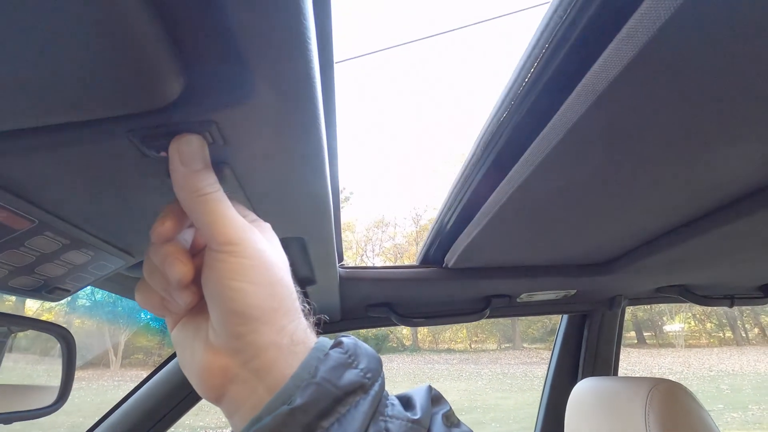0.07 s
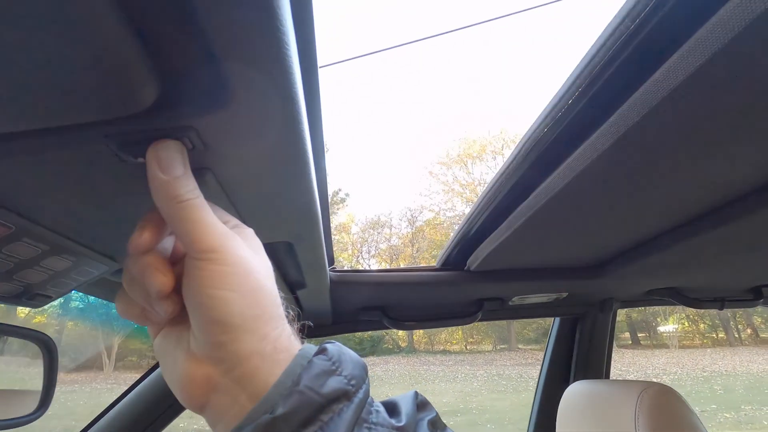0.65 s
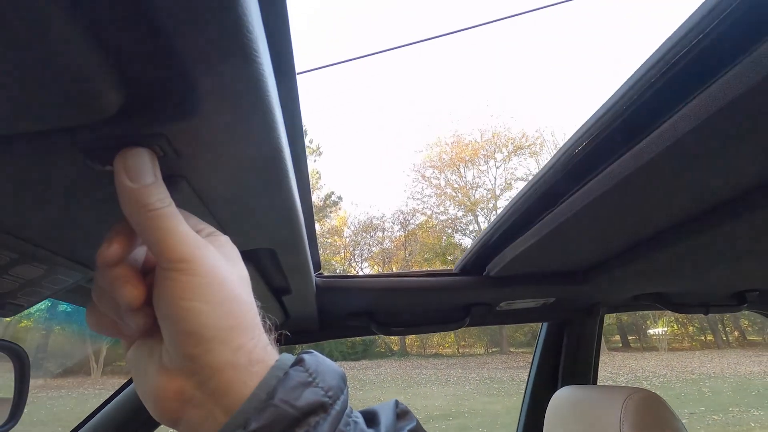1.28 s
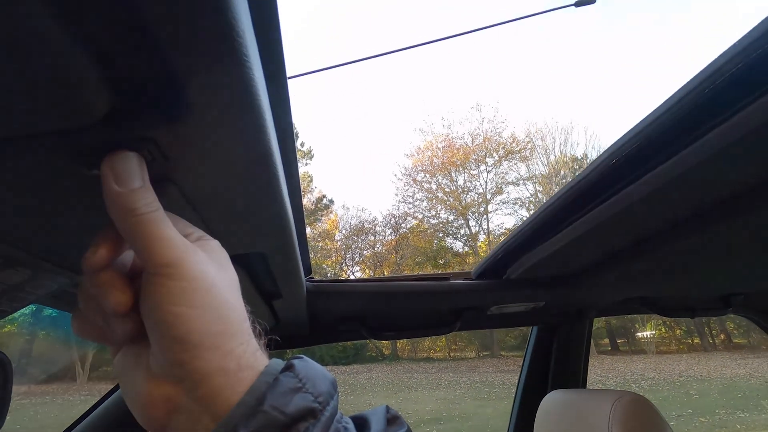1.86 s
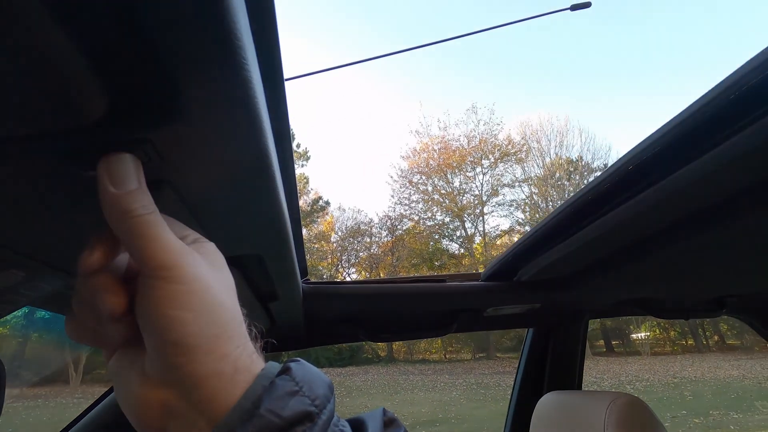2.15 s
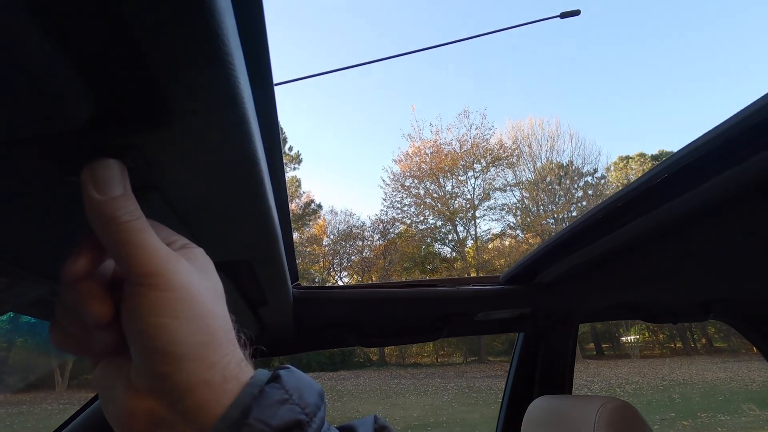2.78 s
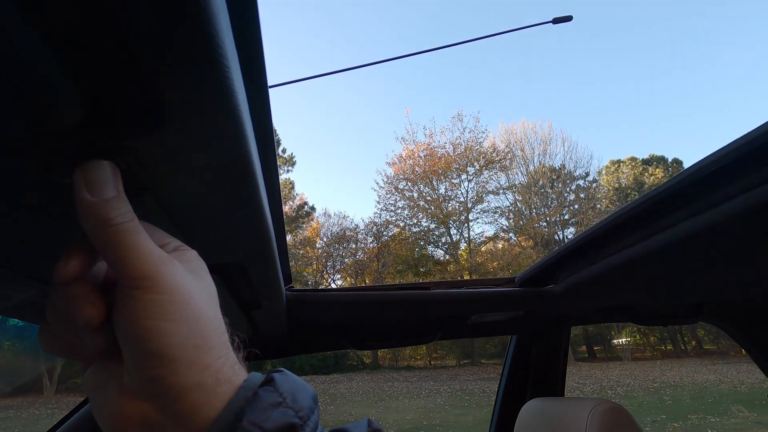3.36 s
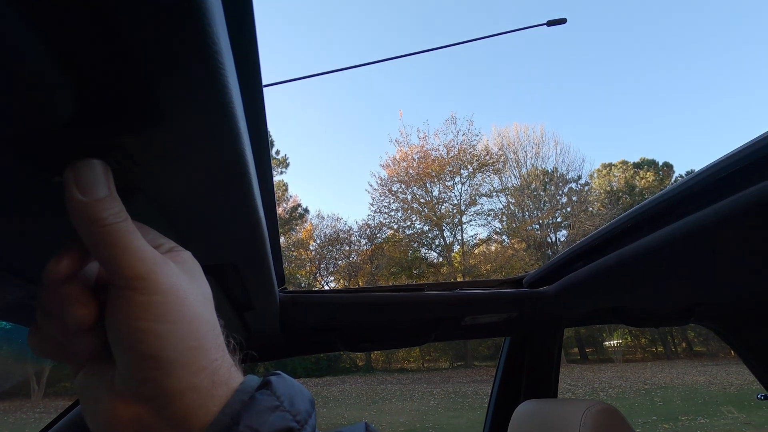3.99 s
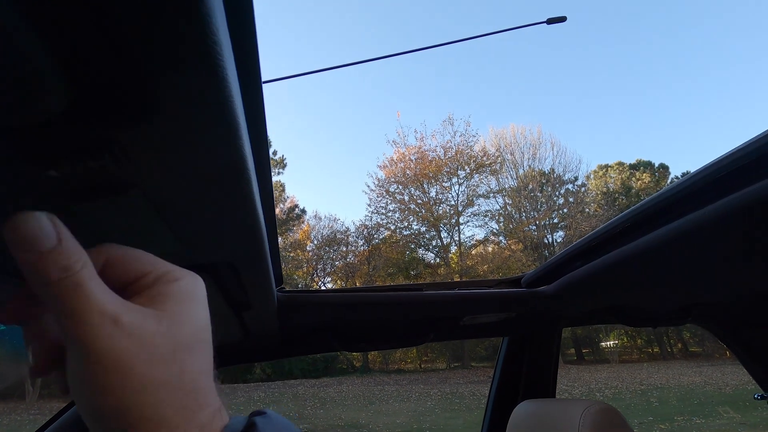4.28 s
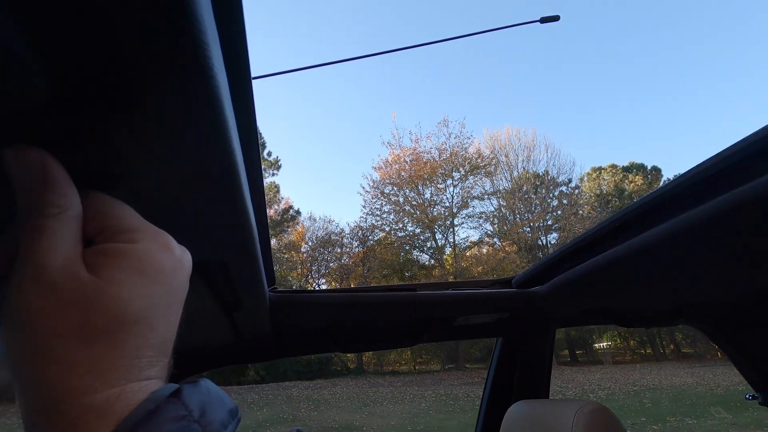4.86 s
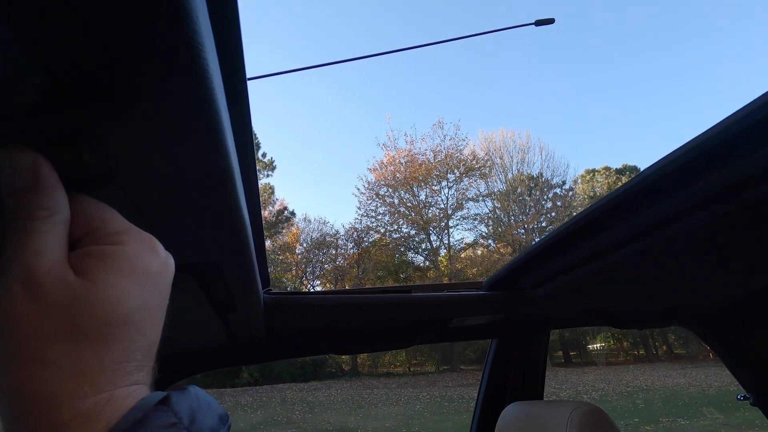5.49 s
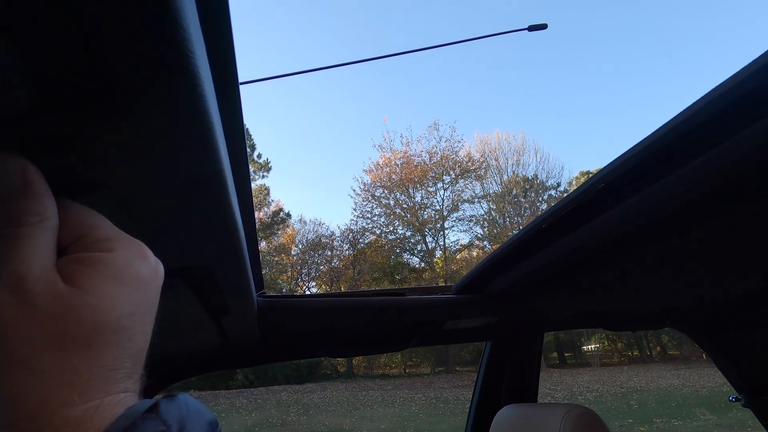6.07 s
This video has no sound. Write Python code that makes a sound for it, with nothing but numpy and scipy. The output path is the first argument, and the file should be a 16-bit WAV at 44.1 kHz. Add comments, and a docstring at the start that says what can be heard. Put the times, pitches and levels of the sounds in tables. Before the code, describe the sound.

A car engine idles throughout with a deep, booming hum and soft ventilation air, heard from the front seat inside the cabin. From the start an electric sunroof slides open, its motor giving a quiet geared whine over a soft sliding hiss. Around 3 seconds it slows slightly as the rubber seal drags faintly, and the engine revs rise a little, peaking near 3.9 seconds. At about 3.8 seconds a plastic switch snaps sharply and the roof motor stops. More clicks follow at 4.1 seconds while the engine stumbles back to idle, with a very faint sleeve rustle. At about 4.7 to 4.8 seconds the switch clicks again and the drive clunks several times in quick succession. The motor then runs on with a slightly brighter hiss and light rubbing, continuing over the idle until the end, just past 6 seconds.

```python
"""Inside a parked car with the engine idling, an electric sunroof slides open, stops and runs on.
The roof motor whines through its gears over the hiss of felt in the rails, and the rubber seal drags
at tight spots. The rocker switch snaps and the drive clunks, ringing the trim as it stops and starts.
The engine's firing pulses boom in the cabin; the revs rise briefly and stumble back to idle.
Behind it all are body rumble, soft ventilation air and the faint brush of a sleeve."""
import sys
import numpy as np
from scipy import signal
from scipy.fft import rfft, irfft
from scipy.io import wavfile
from scipy.ndimage import uniform_filter1d

SR = 44100
rng = np.random.default_rng(int(sys.argv[2]) if len(sys.argv) > 2 else 0)


def file_out(sig):
    """Save sig as 16-bit WAV at sys.argv[1]."""
    # one column per channel
    cols = np.atleast_2d(sig).T
    # limit, then scale
    lim = np.clip(cols, -1, 1)
    pcm = np.round(lim * 32767).astype(np.int16)
    wavfile.write(sys.argv[1], SR, pcm)


N = 275184
TIME = np.arange(N) / SR
FREQS = np.maximum(np.arange(N // 2 + 1) * SR / N, 1)

# engine speed: time_s, firing_hz
ENGINE_SPEED = [(0.0, 30.43), (1.6, 30.88), (2.21, 30.6), (2.8, 31.6), (3.01, 31.74), (3.14, 36.4),
                (3.3, 40.32), (3.49, 41.67), (3.7, 43.25), (3.92, 43.84), (4.07, 41.4), (4.18, 36.94),
                (4.45, 32.96), (4.71, 30.67), (5.33, 29.29), (6.24, 30.6)]


def sunroof(free_hz=81.34, spin_up_s=.018, coast_s=.014, flutter=.0017, throb=.035, grain_db=1.0):
    """The motor whines and the panel slides on felt; friction slows the drive and brightens the hiss."""
    # runs of the motor: on_s, off_s, slide_db, bright_share_db, gear_db, groan_db
    runs = [(-.3, 3.762, -54.5, -20.5, 0, -56), (4.79, 6.5, -55.5, -14, -3.5, -64.5)]
    # motor speed, one curve per run: time_s, shaft_hz
    shaft_speeds = [
        [(0.0, 79.3), (0.12, 78.5), (0.26, 80.1), (0.5, 77.7), (0.95, 78.1), (1.08, 79.2), (1.25, 78.2),
         (1.79, 78.8), (1.92, 81.6), (2.04, 79.4), (2.3, 79.9), (2.5, 78.7), (2.7, 79.8), (2.96, 71.9),
         (3.12, 68.6), (3.55, 72.5), (3.74, 72.6)],
        [(4.88, 78.8), (5.006, 78.0), (5.054, 75.0), (5.2, 73.2), (5.55, 72.3), (5.64, 73.4), (5.78, 77.3),
         (5.984, 81.4), (6.24, 81)],
    ]
    # tone colour of felt sliding in the rails: frequency_hz, level_db
    felt_spectrum = [(150, 0), (320, 4), (500, 1), (700, 1.5), (860, -4.5), (1200, 1), (1550, -3.5),
                     (2500, -8), (3600, -10.5), (5500, -17.5), (7500, -24), (10000, -34), (13000, -57)]
    starts, stops, *levels = np.transpose(runs)
    run = np.maximum(np.searchsorted(starts, TIME) - 1, 0)  # the latest run at each moment
    slide_db, bright_db, gear_db, groan_db = np.array(levels)[:, run]
    moving = gate(starts[run], stops[run], spin_up_s, coast_s)
    steady_hz, = curves(np.vstack(shaft_speeds))
    sag_hz = free_hz - steady_hz  # how far friction pulls the speed down
    shaft_hz = np.maximum(steady_hz * moving, 1)
    phase = 2 * np.pi * np.cumsum(shaft_hz * (1 + flutter * walk(25))) / SR
    tones = motor_whine(shaft_hz, phase, gear_db, groan_db)
    felt = hiss(gain_at(felt_spectrum, FREQS))
    bright = undb(bright_db + 0.5 * sag_hz) * hiss(resonance(FREQS, 3100, 3900) ** 3)
    push = (1 + throb * np.cos(phase)) * undb(grain_db * walk(90))  # the worm pushes once a turn
    slide = (felt + bright) * push * undb(slide_db + 0.2463 * sag_hz)
    return moving * (tones + slide)


def motor_whine(shaft_hz, phase, gear_db, groan_db, waver_db=1.5, left_lag_s=.00003):
    """Gear and commutator tones swell and fade as the panel travels; the worm groans in its housing."""
    # steady tones of the gear train: shaft_multiple, level_db
    gear_tones = [(4, -60), (5, -65), (6, -67), (7, -72), (10, -78), (12, -72.5), (13, -69), (18, -81),
                  (21, -75.5), (22, -76), (26, -78.5), (27, -77), (28, -80)]
    # the strongest motor tones: shaft_multiple
    whine_orders = (9, 15, 16, 20, 24)
    # how those tones swell and fade: time_s, then level_db of each in turn
    whine_levels = [ (0.0, -63.5, -76, -66, -70, -84), (0.4, -62.5, -74, -64.5, -70, -84),
                    (0.6, -64.5, -66, -65.5, -80, -84), (1.0, -66, -65, -64, -82, -84),
                    (1.6, -73, -73, -67, -78, -82), (2.2, -70, -78, -63, -68, -80),
                    (2.72, -72, -73, -61.5, -68, -80), (2.95, -66, -71, -74, -75, -82),
                    (3.35, -71, -72, -78, -78, -82), (3.7, -80, -80, -68, -76, -80),
                    (4.95, -76, -80, -70, -80, -71), (5.2, -73, -80, -73, -82, -69),
                    (5.5, -69, -80, -72, -82, -71), (5.85, -80, -82, -69, -78, -70),
                    (6.02, -84, -84, -64, -73, -71.5)]
    housing_db = 20 * np.log10(abs(resonance(8 * shaft_hz, hz=588, width=20)))
    partials = [(8, groan_db + housing_db)]  # the worm gear tone crosses the housing resonance
    partials += [(order, gear_db + db) for order, db in gear_tones]
    partials += zip(whine_orders, curves(whine_levels))
    stereo_phase = np.array([phase - 2 * np.pi * shaft_hz * left_lag_s, phase])
    tones = sum(undb(db + waver_db * walk(8)) * np.cos(order * stereo_phase) for order, db in partials)
    return np.sqrt(2) * tones * undb([[1], [-1]])  # leans left


def rail_rub(rise_s=.13, fall_s=.02):
    """Bright friction builds up along a dry stretch of rail and drops away at its end."""
    # dry stretches of the rails: start_s, end_s, level_db
    stretches = [(2.658, 3.55, -70), (5.101, 5.919, -68)]
    pressure = sum(undb(db) * gate(start, end, rise_s, fall_s) for start, end, db in stretches)
    return hiss(resonance(FREQS, 6200, 6900) ** 3) * pressure * undb(1.1 * walk(90))


def seal_drag():
    """The rubber seal drags at tight spots and excites two bands of the roof."""
    # tight spots: middle_s, half_length_s, lower_band_db, upper_band_db
    tight_spots = [(2.46, .035, -76, -61), (2.98, .05, -53, -73), (3.076, 0.046, -54.5, -57.5),
                   (3.15, 0.075, -54, -63), (5.35, 0.039, -67, -58), (5.48, .1, -60, -71),
                   (5.97, .03, -78, -63)]
    # roof bands, lower then upper: centre_hz, width_hz
    roof_bands = [(700, 97), (1010, 130)]
    out = 0
    for band, (hz, width) in enumerate(roof_bands):
        drag = sum(undb(band_dbs[band]) * swell(s, half) for s, half, *band_dbs in tight_spots)
        out = out + hiss(resonance(FREQS, hz, width) ** 2) * drag
    return out * undb(2 * walk(40.04))


def rocker_switch():
    """The plastic rocker snaps over, knocking its housing and thudding in the roof lining."""
    # snaps and taps: start_s, rise_s, t60_s, click_hz, click_db, knock_db, thud_db, ring_db
    snaps = [ (3.7578, 0.00049, 0.085, 5450, -29.5, -27, -34.5, -37.5),
             (3.7632, 0.00045, 0.05, 6200, -44, -35.5, -38.5, -54),
             (4.0441, 0.00096, 0.12, 4570, -47.5, -42, -51.5, -54),
             (4.0505, 0.0024, 0.17, 3970, -40, -38, -32, -43),
             (4.057, 0.001, 0.08, 4200, -45.5, -35, -39, -54.5),
             (4.0875, 0.00024, 0.011, 2200, -25.5, -30.5, -33.5, -42),
             (4.0935, 0.00047, 0.07, 3400, -38, -42, -30.5, -45.5),
             (4.391, 0.00088, 0.044, 1000, -49.5, -53, -56.5, -72),
             (4.722, 0.00049, 0.12, 6000, -49, -44, -33.5, -57),
             (4.7345, 0.00085, 0.095, 4970, -38, -29.5, -34, -28.5)]
    # housing (knock), roof lining (thud) and rocker (ring): lag_s, centre_hz, width_hz, t60_s
    switch_parts = [(.0012, 910, 980, 0.1), (.004, 290, 200, 0.1), (0.00011, 3480, 650, 0.06)]
    return blows(snaps, switch_parts)


def drive_clunks():
    """The drive ticks as it runs and clunks as it takes up its slack."""
    # ticks and clunks: start_s, rise_s, t60_s, click_hz, click_db, knock_db, thud_db, ring_db
    clunks = [ (1.295, 0.004, .06, 1400, -54, -54, -54, -66), (3.212, 0.002, .06, 2500, -52, -50, -42, -58),
              (4.76, 0.003, 0.12, 2200, -46, -43, -33.5, -56),
              (4.7745, 0.0032, .08, 1100, -41, -29, -33, -52),
              (4.784, 0.0019, .05, 900, -38, -33.5, -33, -56),
              (4.797, 0.0034, 0.22, 4580, -46, -42, -35, -42),
              (4.811, 0.003, .08, 1350, -42, -40, -34, -50),
              (4.8185, 0.003, 0.07, 2400, -43, -32.5, -25, -35.5),
              (4.838, 0.0046, 0.15, 1400, -43, -41, -25.5, -55.5)]
    # frame (knock), roof (thud) and plastic cover (ring): lag_s, centre_hz, width_hz, t60_s
    drive_parts = [(.0005, 650, 1050, 0.17), (0.00197, 175, 254, 0.27), (.0001, 3260, 1200, .05)]
    return blows(clunks, drive_parts)


def engine(pulse_lag_s=.01823, jitter_rad=.0093, uneven_db=.25, wander_db=.55, lurch_db=2, left_db=.5):
    """Each firing shakes the body and sends a pressure pulse whose overtones boom in the cabin."""
    # overtones of the firing pulses: firing_multiple, level_db
    overtones = [(2, -22.5), (3, -28.5), (4, -27.5), (5, -33), (6, -48.5), (7, -38), (8, -54), (9, -43.5),
                 (10, -39.5), (12, -50.5)]
    # boom of the cabin: frequency_hz, gain_db
    cabin_boom = [(61, -9.5), (71, -4), (81, 0.5), (88, 1), (110, -5.5), (125, -0.5), (152, -4), (175, -28),
                  (215, -14.5), (320, -20), (450, -17.5)]
    # main air resonance of the cabin, whose phase smears each pulse: centre_hz, width_hz, gain_db
    air_mode = [(85.4, 13, 17)]
    # effort of the engine: time_s, pulse_db, scatter_db
    effort = [(0, -1.5, 0.7), (2.3, -1, .4), (3.0, -2.5, 2.5), (3.1, -4.5, 1.2), (3.22, -2, 2),
              (3.4, 1, 1.1), (3.62, 0.5, .8), (3.89, .5, 2.5), (4.1, -1, 3), (4.3, 0.5, 3), (4.42, -3.5, 1),
              (4.75, -0.1, 0.9), (5.6, -.5, -0.3), (6.24, -1.5, 1)]
    # weak firings and hard catches as the revs drop: middle_s, half_length_s, gain_db
    stumbles = [(3.956, 0.013, -12.5), (4.017, 0.02, -11.5), (4.16, .014, -3.5), (4.193, .014, 2),
                (4.228, 0.016, -9), (4.257, 0.016, 5.5), (4.293, .013, -4.5)]
    firing_hz, = curves(ENGINE_SPEED)
    shake_db = -15 - 0.39 * (firing_hz - firing_hz.min())  # the mounts isolate better at speed
    shake_db += wander_db * walk(8.5) + lurch_db * revving() * walk(22)
    phase = 2 * np.pi * np.cumsum(firing_hz) / SR + jitter_rad * walk(30)
    shake = np.sqrt(2) * undb(shake_db) * np.cos(phase)
    pulse_phase = phase - 2 * np.pi * firing_hz * pulse_lag_s  # the pulse arrives after the shake
    pulses = 0
    for order, db in overtones:
        gain = undb(db + uneven_db * walk(14)) * gain_at(cabin_boom, order * firing_hz)
        smear = np.angle(body(air_mode, order * firing_hz))
        pulses -= gain * np.cos(order * pulse_phase + smear)
    effort_db, scatter_db = curves(effort)
    firing_db = effort_db + scatter_db * walk(60)
    firing_db += sum(db * swell(s, half) for s, half, db in stumbles)
    pan = undb([[left_db / 2], [-left_db / 2]])
    return (shake + pulses * undb(firing_db)) * pan


def cabin_air(air_db=-39.5, growl_db=-46, judder_db=-26.5, mount_hz=31.27):
    """Body rumble and soft ventilation; above idle the engine judders on its mounts and growls."""
    # tone colour of the rumble and vent air: frequency_hz, level_db
    air_spectrum = [(14, -17.5), (24, -11.5), (45, -15), (70, -16), (130, -17), (200, -24.5), (330, -30.5),
                    (500, -41), (750, -49.5), (1150, -46), (1800, -54.5), (6200, -66.5), (9500, -81),
                    (13000, -108)]
    air = hiss(gain_at(air_spectrum, FREQS)) * undb(air_db + 0.17 * walk(12))
    rocking_phase = 2 * np.pi * mount_hz * TIME + .6 * walk(8.1)
    judder = np.sqrt(2) * undb(judder_db) * np.cos(rocking_phase)  # beats with the firings
    growl = hiss(resonance(FREQS, 180, 300) ** 4) * undb(growl_db)
    return air + (judder + growl) * revving()


def sleeve():
    """A jacket sleeve rustles faintly as the hand moves."""
    # brushes of the cloth: middle_s, half_length_s, level_db
    brushes = [(4.296, 0.17, -68), (4.73, 0.052, -63)]
    envelope = sum(undb(db) * swell(s, half) for s, half, db in brushes)
    return hiss(resonance(FREQS, 4500, 5500) ** 3) * envelope * undb(2.1 * walk(99))


def revving():
    """How far the engine is above idle speed, 0 to 1, rising gently at first."""
    firing_hz, = curves(ENGINE_SPEED)
    return ((firing_hz - firing_hz.min()) / np.ptp(firing_hz)) ** 2


def blows(events, parts, click_width_ratio=.49, rise_cycles=.75):
    """Each blow clicks first; the parts answer after it, the heavier ones later and more slowly."""
    out = np.zeros((2, N))
    for s, rise, t60, click_hz, click_db, *part_dbs in events:
        add(out, s, undb(click_db) * contact(click_hz, click_width_ratio * click_hz, t60, rise))
        for db, (lag, hz, width, part_t60) in zip(part_dbs, parts):
            add(out, s + rise + lag, undb(db) * contact(hz, width, part_t60, rise_cycles / hz))
    return out


def contact(hz, width, t60, rise, crack_s=.00052, tail_db=-7, size=8192):
    """A brief crack and a tail of close reflections, ringing the trim."""
    # modes of the switch housing and trim: centre_hz, width_hz, gain_db
    trim_modes = [(335.5, 13, -2.5), (464, 68, -4.5), (700, 45, 0), (1058.6, 38, 6.5), (1305, 64, -1),
                  (1850, 170, -25.5), (2900, 180, -5), (3580, 340, 4), (5600, 270, -8), (6400, 1300, 1.5)]
    t = np.arange(size) / SR
    f = np.maximum(np.arange(size // 2 + 1) * SR / size, 1)
    since_peak = np.maximum(t - rise, 0)
    crack = np.exp(-since_peak / crack_s)
    tail = undb(tail_db) * np.exp(-np.log(1000) * since_peak / t60)
    envelope = np.minimum(t / rise, 1) * (crack + tail)
    top_hz = hz + 0.47 * width  # the contact time limits the treble
    lowpass = 1 / (1 - (f / top_hz) ** 2 + 1j * np.sqrt(2) * f / top_hz)
    colour = resonance(f, hz, 2 * width) ** 2 * lowpass * body(trim_modes, f)
    hit = stereo(rng.standard_normal((2, size)) * envelope, colour, f)
    return unit(hit) * np.sqrt(np.mean(envelope ** 2))


def stereo(pair, response, f):
    """Colour two unrelated signals into left and right, alike in the bass and diffuse in the treble."""
    # stereo width: frequency_hz, side_minus_mid_db
    spread = [(60, -25.5), (125, -16), (250, -23.5), (500, -7.5), (1000, -7), (2000, -3.5), (4000, -1.5),
              (8000, 1.5)]
    # stereo balance: frequency_hz, left_minus_right_db
    balance = [(60, 6.5), (250, 1), (1000, 1), (3500, 2), (7500, -2)]
    mid, side = rfft(pair) * response
    side = side * gain_at(spread, f)
    lean = np.sqrt(gain_at(balance, f))
    return irfft(np.array([(mid + side) * lean, (mid - side) / lean]))


def hiss(response):
    """Stereo noise of rms 1 with the given tone colour."""
    return unit(stereo(rng.standard_normal((2, N)), response, FREQS))


def resonance(f, hz, width):
    """Response of one damped mode, gain 1 at its centre."""
    return 1 / (1 + 1j * (f * f - hz * hz) / (f * width))


def body(modes, f):
    """Direct path plus the ringing of all modes."""
    return 1 + sum(undb(db) * resonance(f, hz, width) for hz, width, db in modes)


def gain_at(spectrum, hz):
    """Gain of a (frequency_hz, level_db) spectrum at the given frequencies."""
    f, db = np.transpose(spectrum)
    return undb(np.interp(np.log(hz), np.log(f), db))


def curves(table):
    """Each column of a timed table, sample by sample."""
    times, *columns = np.transpose(table)
    return [np.interp(TIME, times, column) for column in columns]


def walk(rate_hz):
    """Smooth random drift: steps at the given rate, slewed twice, with a spread near 1."""
    hold = int(SR / rate_hz)
    steps = np.repeat(rng.standard_normal(N // hold + 1), hold)
    return 1.4 * uniform_filter1d(uniform_filter1d(steps, hold), hold)[:N]


def gate(start_s, end_s, rise_s, fall_s):
    """An envelope that eases toward 1 from its start and dies away after its end."""
    attack = 1 - np.exp(-np.maximum(TIME - start_s, 0) / rise_s)
    return attack * np.exp(-np.maximum(TIME - end_s, 0) / fall_s)


def swell(middle_s, half_length_s):
    """A smooth rise to 1 and fall."""
    return np.exp(-((TIME - middle_s) / half_length_s) ** 2)


def add(out, start_s, sound):
    """Mix a sound in at its start time."""
    part = out[:, int(start_s * SR):][:, :sound.shape[1]]
    part += sound[:, :part.shape[1]]


def undb(db):
    """Decibels to gain."""
    return 10 ** (np.asarray(db) / 20)


def unit(x):
    """Scale to rms 1."""
    return x / np.sqrt(np.mean(x ** 2))


def scene():
    """Everything heard from the front seat."""
    bed = engine() + cabin_air()
    roof = sunroof() + rail_rub() + seal_drag()
    return bed + roof + sleeve() + rocker_switch() + drive_clunks()


def record(dry, top_hz=15500):
    """A steep low-pass takes off the highest treble."""
    return signal.sosfilt(signal.ellip(8, .2, 70, top_hz, fs=SR, output="sos"), dry)


dry = scene()
out = record(dry)
file_out(out)
```